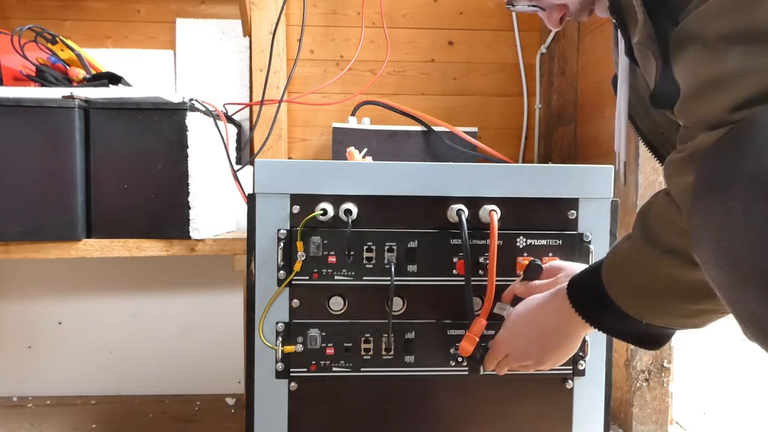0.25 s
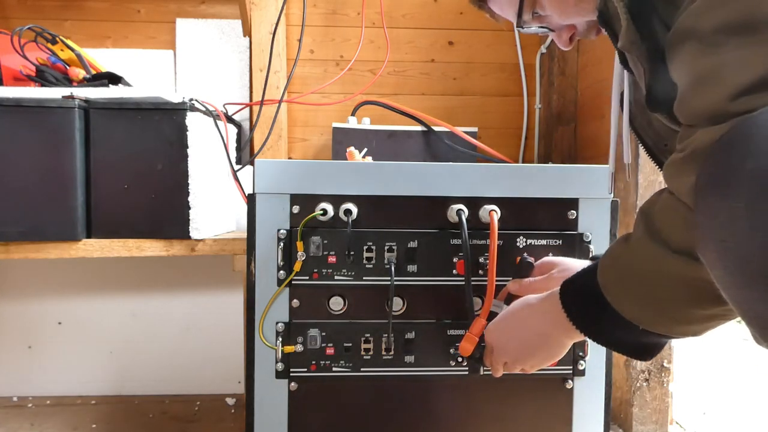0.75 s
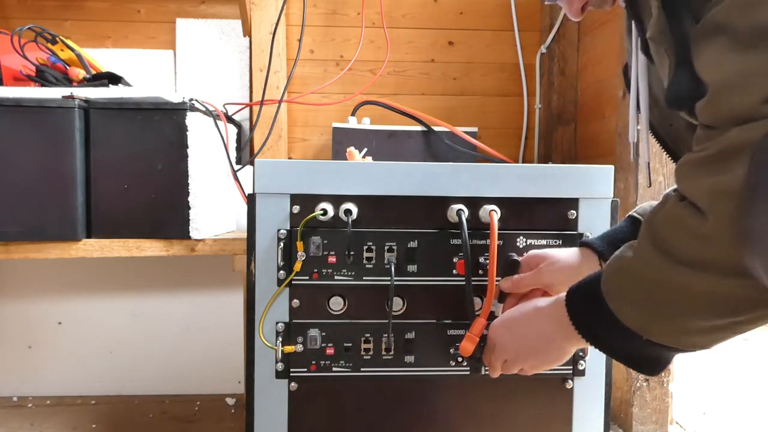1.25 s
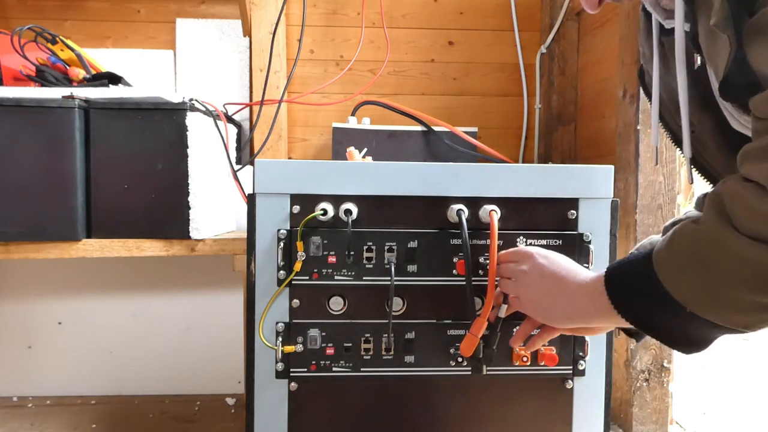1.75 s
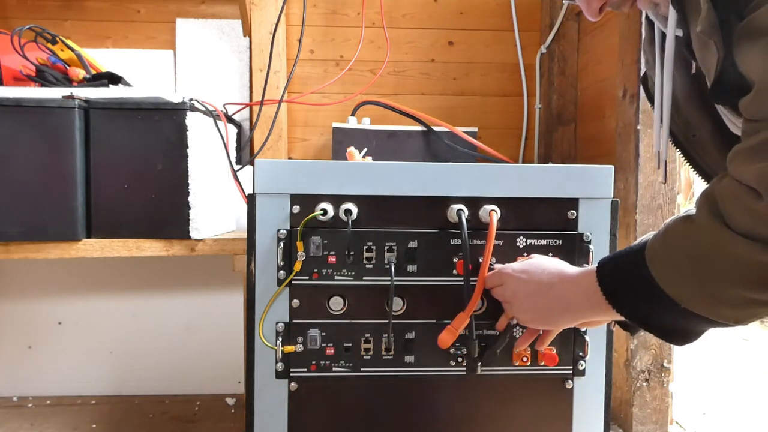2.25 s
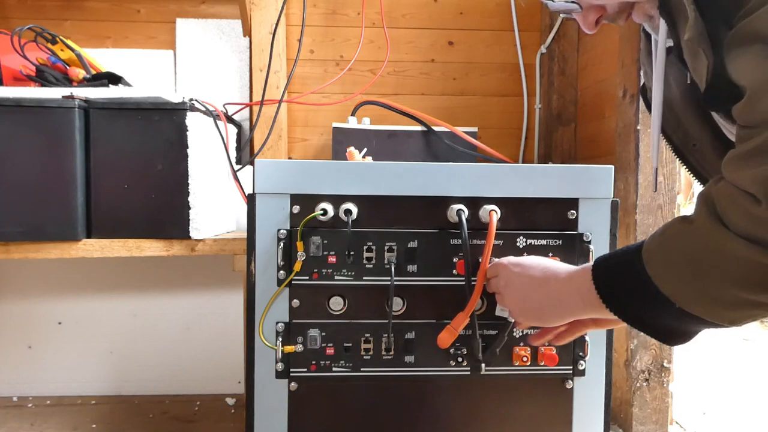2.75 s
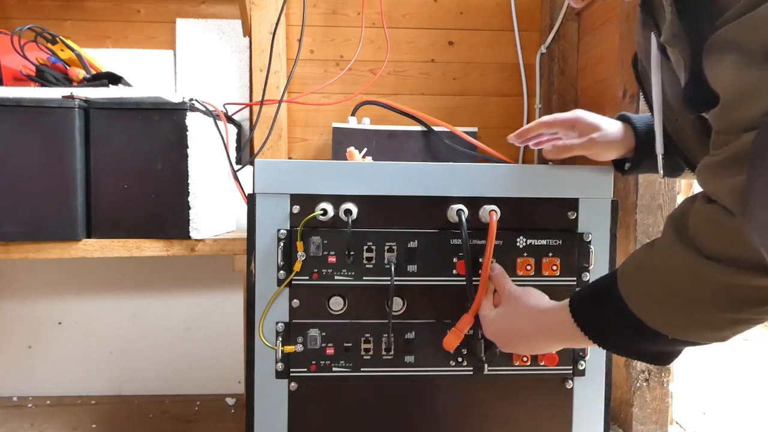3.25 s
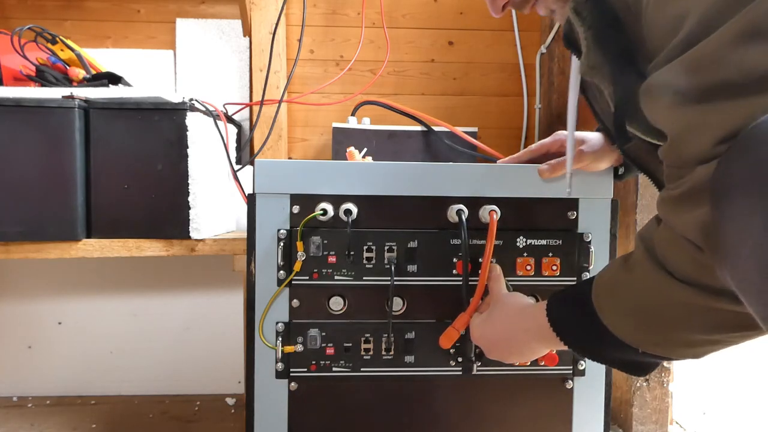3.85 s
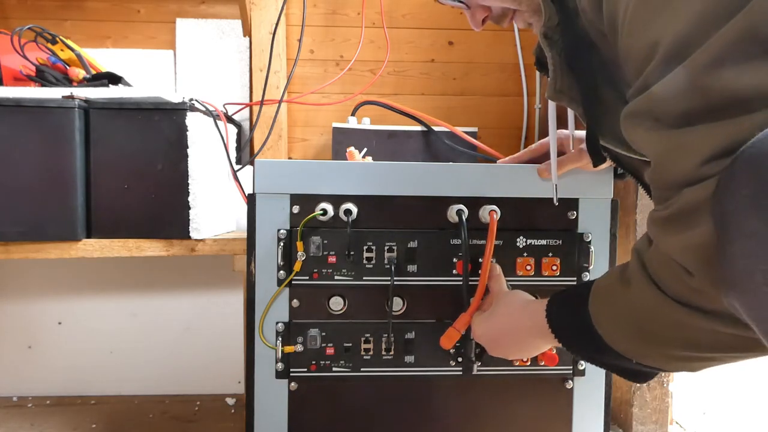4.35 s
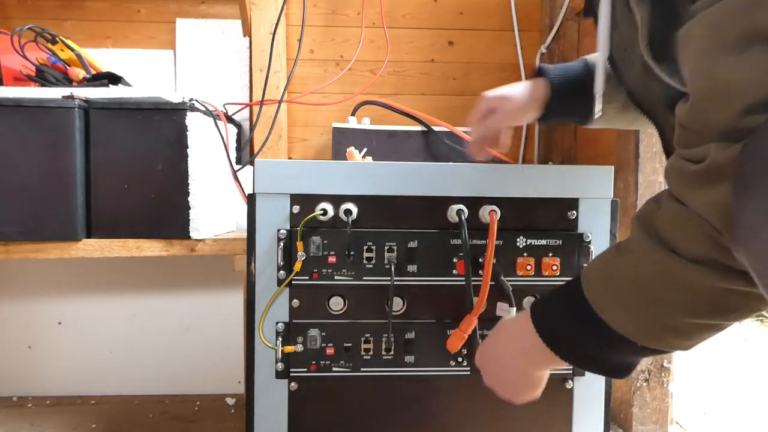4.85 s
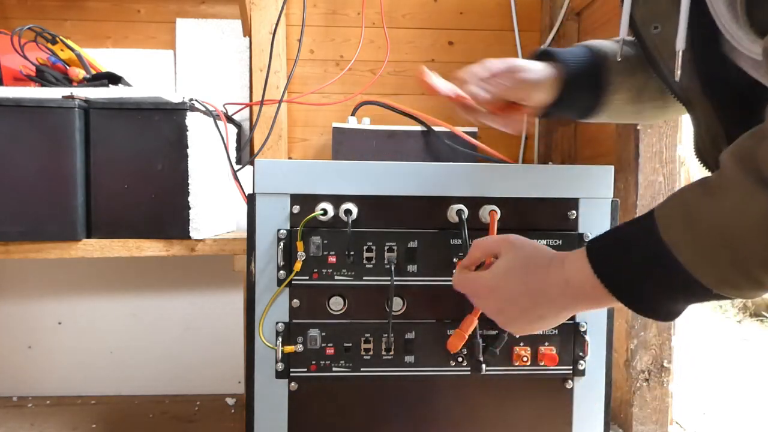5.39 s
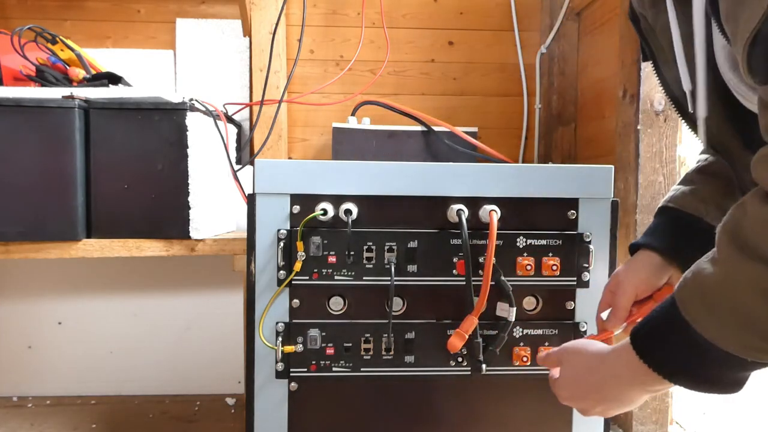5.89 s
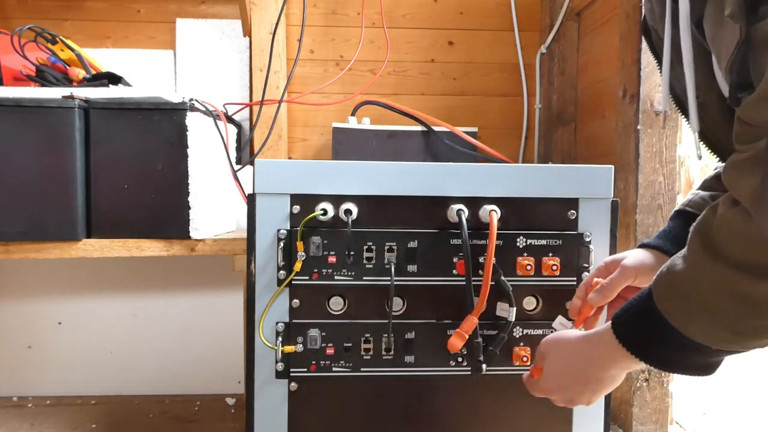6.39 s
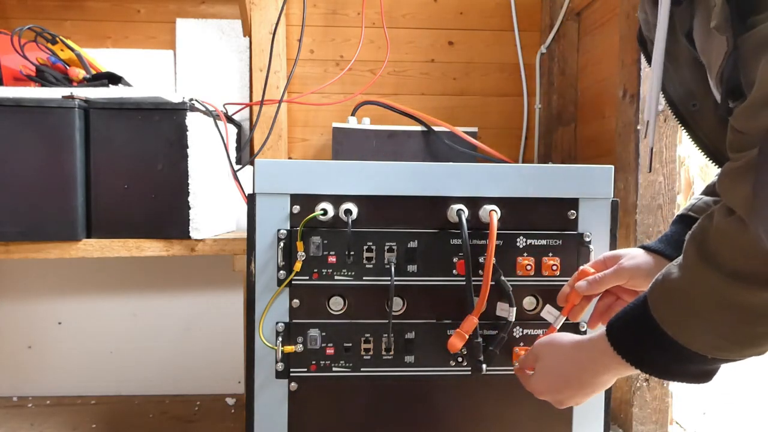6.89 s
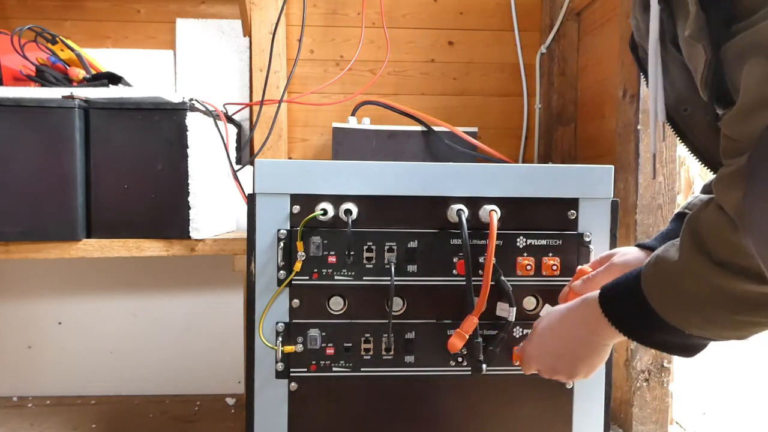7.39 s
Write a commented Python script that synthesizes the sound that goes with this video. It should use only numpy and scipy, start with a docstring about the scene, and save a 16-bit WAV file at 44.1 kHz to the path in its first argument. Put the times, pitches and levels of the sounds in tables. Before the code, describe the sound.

Cable plugs click and knock against hollow steel battery cases in a small wooden workshop, over steady fan hum and thin electronic whine.

```python
"""Stereo microphone in a small wooden workshop; plugs are pushed into a stack of battery units.
From the start a fan hums (shaped noise) and power electronics whine (wavering tones and noise bands).
Soon the steel cases thump and ring (decaying sines, struck resonances); a sleeve and cables rub (noise).
Next rubber and plastic squeak (gliding tones), then latches snap (struck resonances).
Late on come three close blows, and the lower whine surges, drops and returns."""
import sys
import numpy as np
from scipy import signal
from scipy.fft import rfft, irfft, next_fast_len
from scipy.io import wavfile
from scipy.ndimage import uniform_filter1d

SR = 44100
rng = np.random.default_rng(int(sys.argv[2]) if len(sys.argv) > 2 else 0)


def transcribe(u):
    """Save the signal u as a 16-bit wav file named by the first command-line argument.

    u: samples, shape (n,) or (channels, n), limited to [-1, 1]; the rate is SR.
    q: integer samples, one column per channel.
    """
    v = np.clip(np.atleast_2d(u).T, -1, 1)
    q = np.round(v * 32767).astype(np.int16)
    wavfile.write(sys.argv[1], SR, q)


N = 336571  # samples
TAPS = 8192  # length of one struck response, in samples
HZ = np.fft.rfftfreq(TAPS, 1 / SR)
TIME = np.arange(N) / SR

# All levels in the tables are relative: the layers scale or shape them further.
# Fan rush. Each row: frequency in Hz, density in dB per Hz.
FAN_RUSH = [(18, -60), (30, -43), (54, -38), (92, -3), (140, -13), (227, -3), (278, -0.5), (343, -5),
            (500, -19), (650, -41), (1100, -120)]
# Thin hiss of the fan. Each row: frequency in Hz, density in dB per Hz.
FAN_HISS = [(300, -27), (480, -0.5), (570, 1), (700, 6.5), (860, -10), (1050, -2.5), (1500, -11),
            (2100, -12.5), (3800, -17), (6000, -15.5), (9000, -15), (12000, -22.5), (14300, -15.5)]
# Restless bands of the electronics. Each row: centre in Hz, width in Hz, level in dB.
WHINE_BANDS = [(2687, 63, -72.5), (5355, 230, -70.5), (7120, 170, -80.5), (8140, 280, -74),
               (9560, 180, -74), (13800, 95, -97), (15100, 440, -84)]
# Tones of the electronics, low then high. Each row: mean pitch in Hz, level in dB.
WHINE_TONES = [(2614, -70), (5328, -70.5)]
# Course of the lower tone. Each row: time in seconds, level change in dB.
LOW_TONE_LEVEL = [(0, 0), (2, 2.5), (4.5, 2), (5.3, -1), (6.4, -3.5), (6.55, 6), (6.78, 6), (7, -12),
                  (7.63, 2)]
# Arm movements that brush the sleeve along. Each row: middle in seconds, length in seconds, level in dB.
BRUSHES = [(.14, 0.23, -55.5), (.6, 0.33, -61), (1.26, 0.33, -55.5), (1.52, 0.57, -56), (2.16, 0.29, -59),
           (2.74, 0.42, -60), (3.7, 2.4, -63.5), (4.73, 0.65, -56.5), (5.32, 0.21, -50.5),
           (5.45, 2.1, -59.5), (6.88, 0.052, -49), (6.99, 0.048, -45.5)]
# Colour of the cloth. Each row: frequency in Hz, density in dB per Hz.
CLOTH_COLOUR = [(200, 5), (600, 6.5), (1300, 3), (3000, -5), (7000, -6), (11000, -10), (16000, -21)]
# Blows on the cases. Each row: contact in seconds, thump level in dB, thump pitch in Hz,
# panel level in dB, clank level in dB, edge level in dB.
KNOCKS = [(0.062, -64, 290, -52, -53, -60), (0.204, -39.5, 236, -73, -57, -59),
          (0.305, -36, 230.3, -54, -48.5, -55.5), (1.02, -41, 245, -61, -47, -53.5),
          (1.388, -36.5, 232, -45, -50.5, -56), (1.491, -44, 192, -46, -63, -51),
          (2.051, -37, 212, -39, -49, -66), (2.168, -56, 265, -51, -54.5, -54.5),
          (2.488, -33, 256, -43, -39.5, -48.5), (2.494, -25.5, 201, -35, -37.5, -41.5),
          (2.614, -42.5, 232, -64, -55, -68), (3.431, -36.5, 204, -53, -51.5, -56),
          (3.487, -41.5, 226, -52.5, -72, -58), (4.232, -30.5, 209, -53, -47.5, -52.5),
          (4.349, -26.5, 240, -34.5, -29, -29.5), (4.742, -38, 228, -47, -46.5, -52),
          (4.828, -44.5, 191, -43.5, -52, -50), (5.077, -34.5, 189.4, -37.5, -41.5, -62),
          (5.106, -46, 238, -46, -53, -51), (6.744, -34, 236.7, -37.5, -35.5, -57),
          (6.895, -34.5, 239.4, -38.5, -18, -39), (6.985, -28.5, 259, -31, -28, -39.5)]
# Sway of the whole cabinet. Each row: multiple of the thump pitch, level in dB, rise time in seconds.
CABINET_SWAY = [(1, -0.5, 0.0089), (.88, -21.5, 0.037), (1.16, -12.5, 0.013), (1.6, -14, 0.0062)]
# Ringing of the steel cases. Each row: pitch in Hz, width in Hz, level in dB over the broad response.
CASE_MODES = [(374, 27, 13), (427, 22, 6), (520, 35, 8), (564, 48, 4), (705, 50, 14), (794, 108, 11),
              (892, 36, 7), (967, 43, 8), (1076, 36, 11), (1315, 73, 5), (1360, 24, 8.5), (1584, 64, 9),
              (2090, 100, 8), (2810, 72, 11), (3110, 104, 13), (1488, 34, 13), (1735, 44, 9), (1962, 28, 9),
              (3630, 110, 12)]
# Pulls that drag a cable over the cases. Each row: middle in seconds, length in seconds, level in dB.
PULLS = [(.18, .1, -56.5), (1.54, 0.31, -52), (1.95, 0.44, -51), (2.18, .14, -51.5), (2.9, 0.19, -51),
         (4.25, 0.046, -40.5), (4.77, 0.31, -52.5), (5.135, 0.18, -46), (5.88, 0.37, -58)]
# Colour of the dragged cables. Each row: frequency in Hz, density in dB per Hz.
DRAG_COLOUR = [(40, -62), (90, 3.5), (135, -6), (200, 5.5), (270, 3.5), (350, -9.5), (700, -27),
               (1200, -24.5), (2000, -72), (4000, -40)]
# Rubber and plastic slipping. Each row: start in seconds, level in dB, middle pitch in Hz,
# length in seconds, pitch unsteadiness as a share.
SQUEAKS = [(0.376, -62, 4280, 0.03, 0.084), (.569, -58, 6200, 0.029, 0.18), (1.47, -45.5, 674, 0.018, .1),
           (1.895, -47, 697, 0.015, 0.09), (1.981, -40, 683, 0.018, 0.26), (2.167, -66, 2900, 0.023, 0.038),
           (2.722, -51.5, 658, 0.063, 0.19), (2.724, -61, 5960, 0.041, 0.076),
           (2.815, -61, 5400, 0.041, .04), (2.876, -54.5, 4570, 0.041, 0.023),
           (3.491, -60.5, 3100, 0.021, 0.12), (3.794, -56, 10000, .017, .023),
           (4.075, -61, 9800, 0.018, 0.036), (4.585, -61, 4870, 0.046, 0.04),
           (5.027, -42.5, 1240, 0.005, .03), (5.106, -44, 360.3, 0.069, .03),
           (5.174, -32.5, 647, 0.0145, 0.092), (5.193, -33.5, 586, .01, 0.051),
           (7.543, -68.5, 4090, 0.061, 0.0098)]
# Plastic clicks. Each row: start in seconds, latch ring level in dB, latch pitch in Hz,
# shell level in dB, shell pitch in Hz, plug body level in dB.
SNAPS = [(0.8365, -72, 9300, -34, 3060, -39), (1.1276, -4.5, 10350, -29.5, 2950, -30.5),
         (1.4957, -41, 9300, -46.5, 3200, -49), (1.575, -54, 9610, -60, 3200, -74),
         (1.7892, -36.5, 8900, -45, 3200, -50.5), (2.011, -21, 12150, -34, 5850, -68),
         (3.6797, -36.5, 9400, -66, 3200, -67), (3.836, -41.5, 9200, -58, 3200, -64),
         (4.348, -12.5, 10760, -23, 2830, -27.5), (4.7198, -40, 9390, -48, 3200, -45),
         (5.0746, -29, 8500, -35.5, 2800, -40), (5.195, -28.5, 10300, -62, 3200, -53),
         (5.5534, -58, 9500, -47, 6360, -45.5)]
# Ringing of a plug. Each row: pitch in Hz, width in Hz, level in dB over the broad response.
PLUG_MODES = [(1270, 79, 10.5), (1660, 51, -31), (2132, 55, 1), (2650, 220, -7.5), (3230, 110, -19),
              (5550, 1560, 0.5)]
# Nearby surfaces. Each row: delay in seconds, gain as a factor.
ECHOES = [(.0007, 0.15), (.0018, 0.2), (.0034, 0.37), (.0093, .2), (0.0124, 0.25)]
# Decay of the room. Each row: frequency in Hz, time to fall 60 dB in seconds.
ROOM_DECAY = [(100, 0.043), (260, 0.27), (700, 0.17), (1800, 0.14), (5000, 0.16), (10000, 0.14),
              (15000, 0.084)]
# Stereo width. Each row: frequency in Hz, left-right likeness from 0 to 1.
LIKENESS = [(30, 0.12), (120, 0.43), (260, 0.78), (600, 0.34), (1500, 0.15), (5000, 0.67), (15000, 0.5)]

AIR_DB, HISS_TOP_HZ = -57, 15000
WHINE_SWELL_DB = 1.2  # rms rise and fall of each tone
SLEEVE_REST_DB = -84  # the sleeve never keeps quite still
BOOM_DB = -27  # deep boom of the cases against the thump
SCATTER_HZ = 2530  # here a blow takes half of its full detours through the panels
SHAKE_DB, SHAKE_RISE_S = -21, 0.038  # cables after a blow: level against the thump, time to widest swing
RUBBER_HZ = 610  # slips pitched above this are stiffer and sag less
EDGE_HZ = 15700  # upper band edge of the recorder


def amp(db):
    """Decibels to gain."""
    return 10 ** (np.asarray(db) / 20)


def unit(x):
    """Scales to rms 1."""
    return x / np.sqrt(np.mean(x ** 2) + 1e-20)


def read(points, hz):
    """Reads a table on a log-frequency axis."""
    f, value = np.transpose(points)
    return np.interp(np.log(hz + 1), np.log(f + 1), value)


def add(mix, s, sound):
    """Lays a sound into the mix at time s."""
    part = mix[max(round(s * SR), 0):][:len(sound)]
    part += sound[:len(part)]


def peak(f, hz, width):
    """Gain of a resonance: 1 at its centre, a half at the edges of its width."""
    return 1 / (1 + (2 * (f - hz) / width) ** 2)


def ringing(modes):
    """Gain of a body whose modes stand out of a flat response."""
    return 1 + sum(amp(db) * peak(HZ, hz, width) for hz, width, db in modes)


def strike(gain, lag):
    """Causal impulse response with the given gain; each frequency arrives lag seconds late."""
    both_sides = np.r_[gain, gain[-2:0:-1]]
    log_gain = np.log(np.maximum(both_sides, 1e-5))
    response = np.exp(np.conj(signal.hilbert(log_gain)))[:len(HZ)]  # minimum phase
    cycles = np.cumsum(lag * np.ones(len(HZ))) * HZ[1]
    return irfft(response * np.exp(-2j * np.pi * cycles))


def noise(gain):
    """Noise of rms 1 with the given gain over frequency."""
    size = next_fast_len(N)
    white = rfft(rng.standard_normal(size))
    colour = np.interp(np.fft.rfftfreq(size, 1 / SR), HZ, gain)
    return unit(irfft(white * colour, size)[:N])


def drift(hz):
    """Slow random motion of rms 1, with hz new targets per second."""
    targets = rng.standard_normal(2000)
    return unit(uniform_filter1d(np.interp(TIME * hz, np.arange(2000), targets), 200))


def swell(t, rise):
    """Grows to 1 in the rise time, then dies away."""
    u = np.maximum(t, 0) / rise
    return u * np.exp(1 - u)


def strokes(rows):
    """Power of sliding movements: each speeds up and slows down in one smooth arch."""
    power = 0
    for s, length, db in rows:
        arch = np.cos(np.pi * np.clip((TIME - s) / length, -.5, .5))
        power = power + (amp(db) * arch) ** 2
    return power


def spread(a, b):
    """Two unrelated signals become a left-right pair, as alike as the table says at each frequency."""
    same = np.clip(read(LIKENESS, np.fft.rfftfreq(len(a), 1 / SR)), 0, 1)
    mid = irfft(rfft(a) * np.sqrt((1 + same) / 2), len(a))
    side = irfft(rfft(b) * np.sqrt((1 - same) / 2), len(a))
    return np.array([mid + side, mid - side])


def fan(hiss_db=-61.5, hum_db=-59.5, hum_hz=268, hum_width_hz=90, rumble_db=-3.0, gust_db=1):
    """Moving air: a low rush, a duct resonance and thin hiss, drifting in level together."""
    rush = amp(read(FAN_RUSH, HZ) - np.maximum(HZ - 450, 0) / 10)  # steeper fall above 450 Hz
    hum = peak(HZ, hum_hz, hum_width_hz)
    hiss = amp(read(FAN_HISS, HZ)) * (HZ < HISS_TOP_HZ)
    layers = [(AIR_DB + rumble_db, rush), (hum_db, hum), (hiss_db, hiss)]
    air = [sum(amp(db) * noise(gain) for db, gain in layers) for _ in range(2)]
    return spread(*air) * amp(gust_db * drift(9.9))


def whine(flutter_db=1.9, waver=0.001856):
    """Switching electronics sing two wavering tones amid narrow, restless bands."""
    gain = sum(amp(db) * unit(peak(HZ, hz, width)) for hz, width, db in WHINE_BANDS)
    level = np.sqrt(np.mean(gain ** 2))
    bands = level * spread(noise(gain), noise(gain)) * amp(flutter_db * drift(22))
    tones = []
    for hz, db in WHINE_TONES:
        phase = 2 * np.pi * np.cumsum(hz * (1 + waver * drift(30))) / SR
        tones.append(amp(db + WHINE_SWELL_DB * drift(7)) * np.sin(phase))
    low, high = tones
    return bands + low * amp(np.interp(TIME, *np.transpose(LOW_TONE_LEVEL))) + high


def rustle(grain_db=3, level_db=-4.5, ticks_per_s=70, tick_db=-8):
    """Cloth slides unevenly as the arm moves, and cable sheaths tick against each other."""
    motion = np.sqrt(strokes(BRUSHES) + amp(SLEEVE_REST_DB) ** 2)
    colour = amp(read(CLOTH_COLOUR, HZ))
    cloth = unit(noise(colour) * amp(grain_db * drift(180)))
    catches = (rng.random(N) < ticks_per_s / SR) * rng.standard_normal(N)
    tick = strike(colour * ringing(PLUG_MODES), 0)
    ticks = unit(signal.oaconvolve(catches, tick)[:N])
    return amp(level_db) * motion * (cloth + amp(tick_db) * ticks)


def thumps(lead=0.0017):
    """The whole cabinet takes up the push, lead seconds ahead of the hard contact, then lets it go."""
    out, t = np.zeros(N), np.arange(TAPS) / SR
    for s, db, hz, *_ in KNOCKS:
        for multiple, mode_db, rise in CABINET_SWAY:
            sway = swell(t, rise) * np.sin(2 * np.pi * multiple * hz * t)
            add(out, s - lead, amp(db + mode_db) * sway)
    return out


def clanks(travel=0.002334, scatter=.0014):
    """Each blow rings the modes of the steel cases, with its own balance from boom to edge."""
    out = np.zeros(N)
    lag = travel * np.sqrt(1000 / (HZ + 150))  # bending waves carry the treble faster than the bass
    for s, thump_db, _, panel_db, clank_db, edge_db in KNOCKS:
        detour = scatter * np.interp(HZ, np.linspace(0, SR / 2, 160), rng.exponential(size=160))
        late = lag + detour * HZ / (HZ + SCATTER_HZ)
        boom_db = thump_db + BOOM_DB
        # spectrum points: (Hz, dB)
        boom = [(30, boom_db - 1), (90, boom_db + 55), (140, boom_db + 25)]
        panel = [(350, panel_db + 28), (700, panel_db + 28.0)]
        clank = [(1150, clank_db + 18.5), (1900, clank_db + 20.0)]
        edge = [(2500, edge_db + 23), (3400, edge_db + 18), (5500, edge_db + 16.5),
                (11000, edge_db + 17.5), (15000, edge_db - 19)]
        blow = amp(read(boom + panel + clank + edge, HZ))
        add(out, s, strike(blow * ringing(CASE_MODES), late))
    return out


def drag(grain_db=3, level_db=-3):
    """Stiff cables catch and slide when pulled or shaken by a blow, and the cases mutter with them."""
    shaking = sum((amp(db + SHAKE_DB) * swell(TIME - s, SHAKE_RISE_S)) ** 2 for s, db, *_ in KNOCKS)
    motion = np.sqrt(strokes(PULLS) + shaking)
    sliding = noise(amp(read(DRAG_COLOUR, HZ)) * ringing(CASE_MODES))
    return amp(level_db) * motion * unit(sliding * amp(grain_db * drift(70)))


def squeaks(rough=0.36, sag=0.17):
    """Short stick-slip tones of unsteady pitch and grip; low ones sag most as the rubber lets go."""
    out = np.zeros(N)
    for s, db, hz, length, waver in SQUEAKS:
        size = max(int(length * SR), 64)
        pitch, grip = uniform_filter1d(rng.standard_normal((2, TAPS)), size=50)[:, :size]
        glide = sag * min(RUBBER_HZ / hz, 1) * np.linspace(1, -1, size)
        tone = np.sin(2 * np.pi * np.cumsum(hz * (1 + glide + waver * unit(pitch))) / SR)
        add(out, s, amp(db) * signal.windows.tukey(size, .8) * (1 + rough * unit(grip)) * tone)
    return out


def snaps(ring_db=14, ring_width_hz=1800, shell_width_hz=1900, travel=0.000993, scatter=0.00027):
    """A latch springs home in a tight cluster: its tongue rings over the plastic shell and plug body."""
    out = np.zeros(N)
    for s, latch_db, hz, shell_db, shell_hz, body_db in SNAPS:
        # spectrum points: (Hz, dB)
        body = [(100, body_db + 2), (500, body_db + 21), (1800, body_db + 25.5)]
        shell = [(shell_hz, shell_db + 20.5), (shell_hz + shell_width_hz, shell_db + 16.5)]
        latch = [(8500, latch_db), (12500, latch_db), (15500, latch_db - 5)]
        click = amp(read(sorted(body + shell + latch), HZ)) * ringing(PLUG_MODES)
        tongue = amp(latch_db + ring_db) * peak(HZ, hz, ring_width_hz)
        lag = travel + scatter * np.interp(HZ, np.linspace(0, SR / 2, 24), rng.standard_normal(24))
        add(out, s, strike(click + tongue, lag))
    return out


def nearby(x):
    """First reflections from the cabinet front, the walls and the floor."""
    out = x.copy()
    for delay, gain in ECHOES:
        add(out, delay, gain * x)
    return out


def room(x, wet_db, build=0.00073):
    """A small wooden room: dense reflections that build up fast and die quickly, slowest near 260 Hz."""
    size = SR // 2
    taps = rng.standard_normal((2, size)) * (rng.random((2, size)) < .2)
    hz, t, z = signal.stft(taps, SR, nperseg=256)
    decay = amp(-60 * t / read(ROOM_DECAY, hz)[:, None])
    tails = signal.istft(z * decay, SR, nperseg=256)[1][:, :size]
    tails = tails * (1 - np.exp(-np.arange(size) / SR / build))
    tails = spread(*tails / np.linalg.norm(tails, axis=1, keepdims=True))
    return x + amp(wet_db) * signal.oaconvolve(x[None], tails, axes=1)[:, :N]


def scene():
    """Handling sounds in the room over the steady machines, all leaning slightly to the right."""
    machines = fan() + whine()
    friction = room(rustle() + drag() + squeaks(), wet_db=-2.0)
    cases = room(thumps(), wet_db=-15.5) + room(nearby(clanks()), wet_db=1.5)
    plugs = room(nearby(snaps()), wet_db=1.0)
    return (machines + friction + cases + plugs) * amp([[-.3], [.3]])


def record(dry):
    """The recorder's band limit: a steep low-pass."""
    low_pass = signal.firwin(401, EDGE_HZ, window=("kaiser", 8), fs=SR)
    return signal.oaconvolve(dry, low_pass[None], "same")


dry = scene()
out = record(dry)
transcribe(out)
```